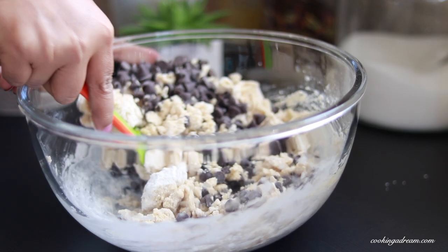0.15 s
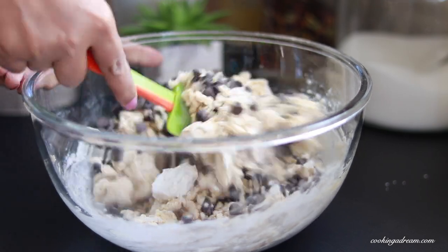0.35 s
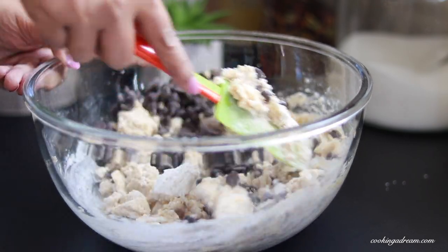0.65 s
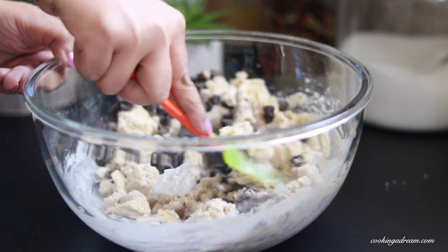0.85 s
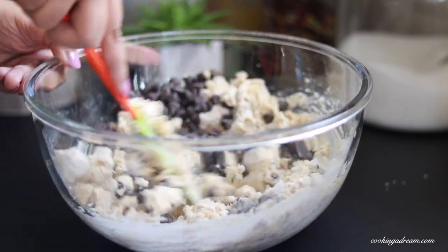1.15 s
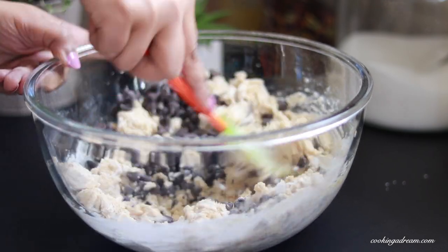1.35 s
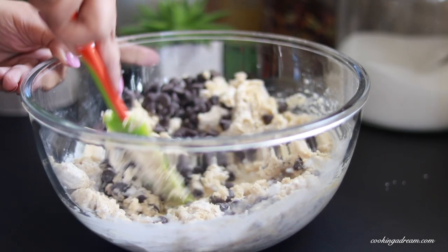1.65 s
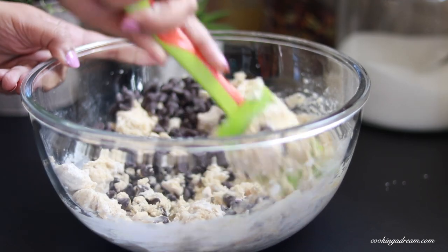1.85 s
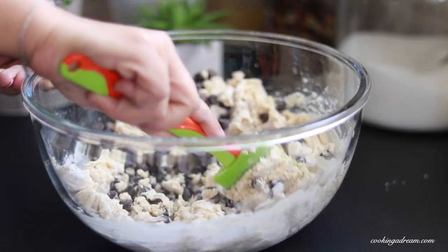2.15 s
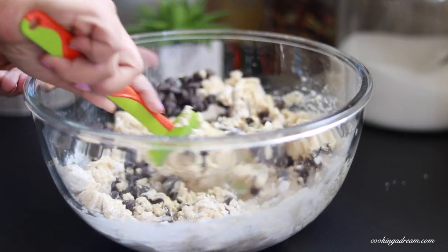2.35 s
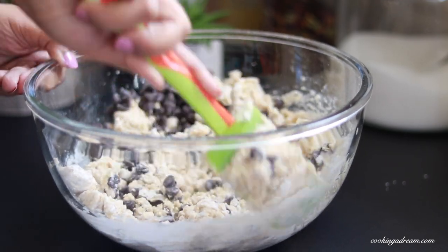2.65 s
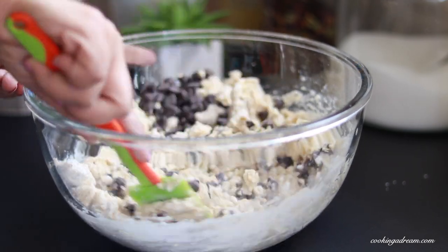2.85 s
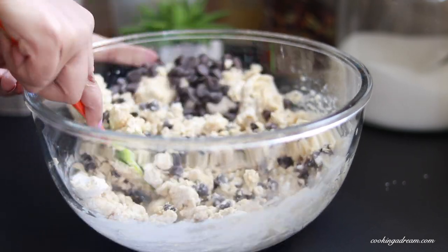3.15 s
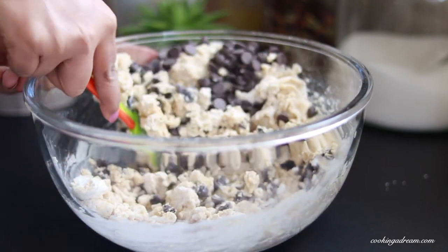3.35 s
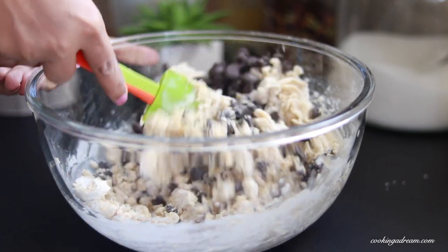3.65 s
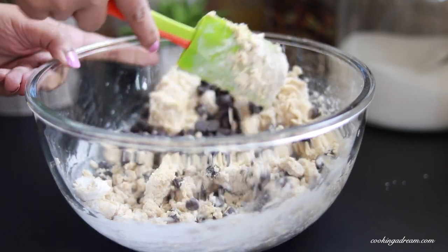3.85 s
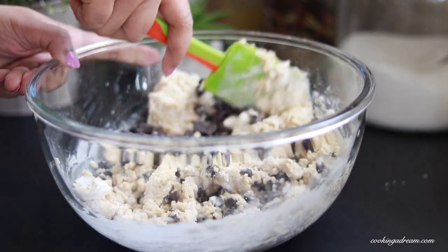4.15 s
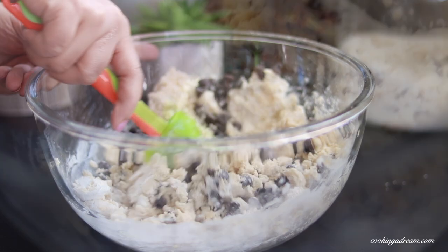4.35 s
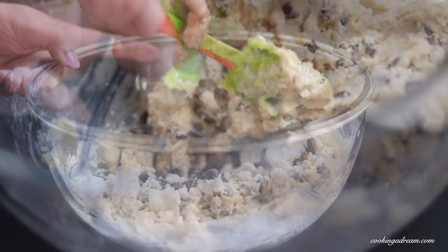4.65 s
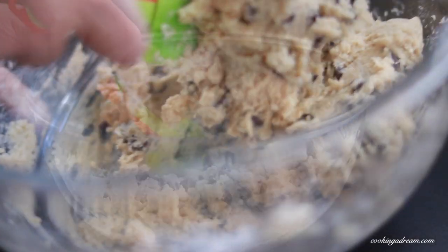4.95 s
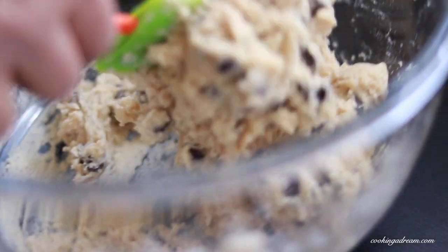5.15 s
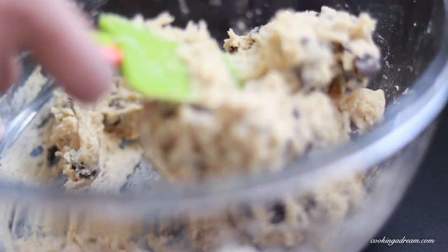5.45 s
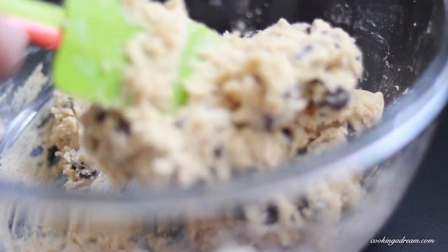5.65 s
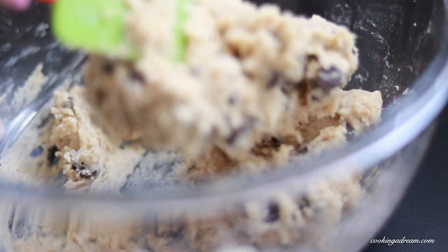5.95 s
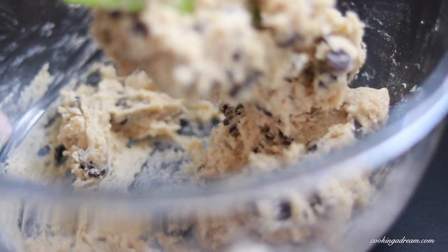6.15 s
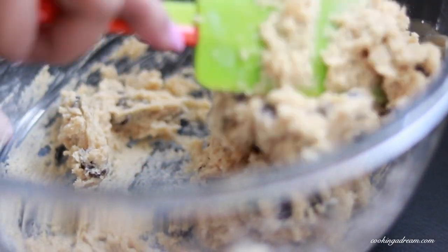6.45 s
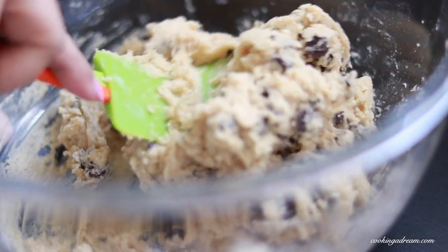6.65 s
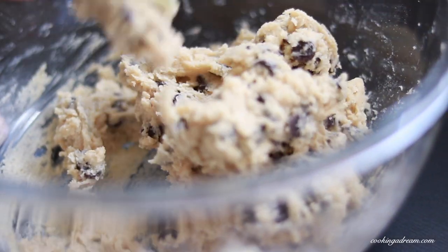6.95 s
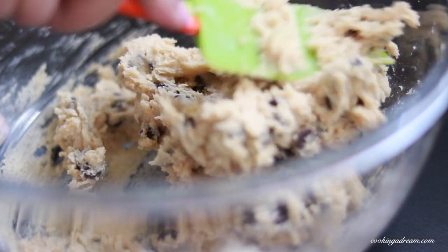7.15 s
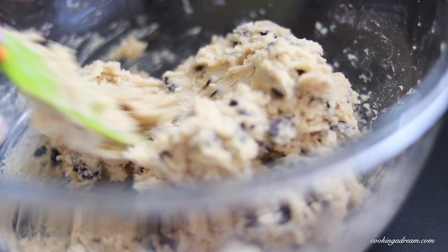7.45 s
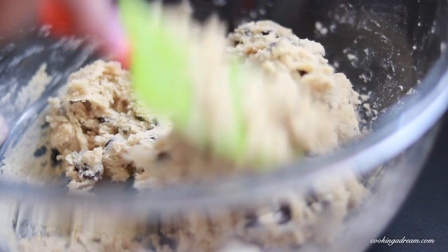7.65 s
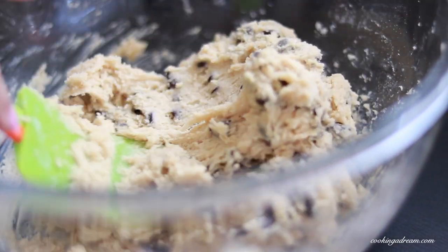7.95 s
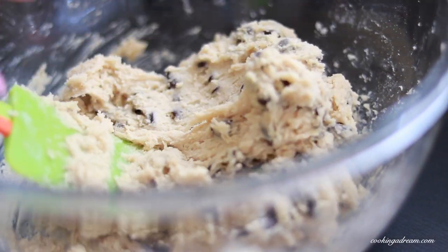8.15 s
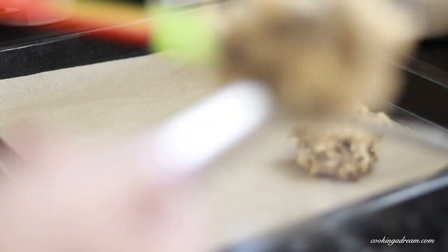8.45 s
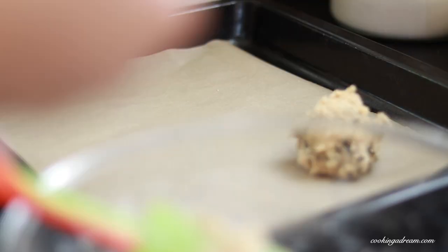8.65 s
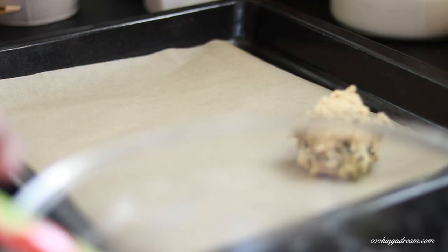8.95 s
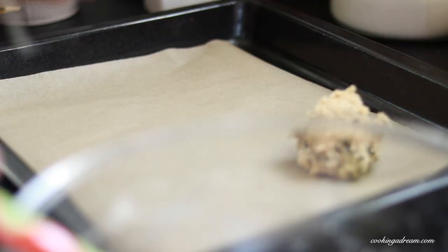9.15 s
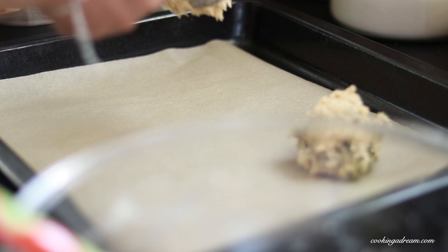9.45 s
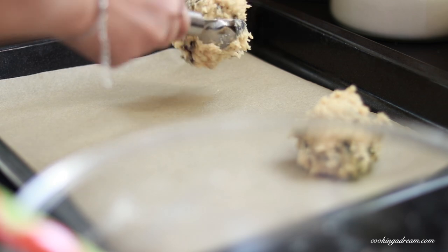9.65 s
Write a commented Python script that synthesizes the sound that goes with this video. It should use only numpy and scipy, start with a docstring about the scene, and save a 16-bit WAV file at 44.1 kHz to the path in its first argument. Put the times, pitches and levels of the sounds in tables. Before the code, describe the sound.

Close in a home kitchen, a spatula works stiff dough in a glass bowl. A hard wooden knock comes first, then sharp ringing clinks, dry rustling strokes and crumbly ticks. A duller thud lands midway among hollow scuffs. Later strokes are sparser, ending with one glass clink. Outside, a small engine speeds up and a few birds whistle faintly.

```python
"""Stiff dough folded in a glass bowl

Close by on a kitchen counter, a spatula folds dough and chocolate chips: clinks and rattles ring the bowl's
paired modes, the handle adds short taps, and ticks, rustle and scuffs are shaped noise.
Two knocks are wooden modes with noise tails. Through the window a small engine, a stack of wavering
multiples, speeds up twice and birds whistle in gliding sines, over filtered-noise room tone and far traffic."""
import sys
import numpy as np
from scipy import signal
from scipy.fft import rfft, irfft, next_fast_len
from scipy.io import wavfile
from scipy.ndimage import uniform_filter1d

SR = 44100
rng = np.random.default_rng(int(sys.argv[2]) if len(sys.argv) > 2 else 0)


def master_out(mix):
    """Clip the mix to full scale and print it as 16-bit PCM to the path in sys.argv[1]."""
    frames = np.transpose(np.atleast_2d(mix))
    ceiling = np.clip(frames, -1, 1)
    pcm = np.round(ceiling * 32767).astype(np.int16)
    wavfile.write(sys.argv[1], SR, pcm)


N = 432607

# Chips and handle striking the glass. Each row: start in seconds, level of the high modes in dB, level of
# the low modes in dB, pitch the struck spot favours in Hz, pitch of the mode whose pair starts in
# opposition in Hz, lift of the lowest mode in dB.
CONTACTS = [(0.399, -48.5, -48, 2640, 5180, 2.5), (0.4637, -38.5, -45.5, 3300, 986, 2),
            (0.509, -40, -55.5, 5180, 2710, 5), (.588, -64, -73, 2710, 986, -6),
            (0.68, -70.5, -78, 2680, 986, -1), (1.2221, -84, -82, 5180, 3875, 0),
            (2.5925, -53.5, -57.5, 1870, 986, 1), (2.6182, -46.5, -50, 2700, 3875, -1.5),
            (2.9742, -53, -67, 2700, 1754, -3), (3.657, -68, -73, 1500, 986, 0),
            (3.689, -75, -63, 1600, 2710, -8), (3.745, -43.5, -59.5, 2050, 986, 0),
            (3.778, -56, -80, 3000, 986, 0), (3.86, -59, -73, 2500, 2710, -3),
            (4.4436, -60.5, -77.5, 1200, 2710, 0.5), (4.5479, -73, -69.5, 4000, 1754, -2),
            (7.812, -77, -74, 3280, 1754, 0), (8.7815, -61.5, -44.5, 2710, 2710, 0.5),
            (8.885, -88, -65, 3870, 2710, 1), (8.944, -80, -67, 2680, 986, 10)]


def from_db(db):
    """Gain of a level in dB."""
    return 10 ** (np.asarray(db) / 20)


def rms_one(x):
    """Scaled to rms 1."""
    return x / np.sqrt(np.mean(x ** 2) + 1e-20)


def in_time(rows):
    """Every column of a curve table, sample by sample."""
    s, *columns = np.transpose(rows)
    return [np.interp(np.arange(N) / SR, s, column) for column in columns]


def at_hz(points, hz, axis=1):
    """A column of a spectrum table at hz, read along log frequency."""
    return np.interp(np.log(hz), np.log(np.array(points)[:, 0]), np.array(points)[:, axis])


def lay(out, s, sound):
    """Adds a short sound to out, starting at s seconds."""
    start = round(s * SR)
    out[..., start:start + sound.shape[-1]] += sound


def drift(rate):
    """Slow random wander of rms 1: noise through a double pole, made at 1/40 of the sample rate."""
    r = np.exp(-80 * np.pi * rate / SR)
    white = rng.standard_normal(N // 40 + 2002)
    slow = signal.lfilter([1], [1, -2 * r, r * r], white)[2000:]
    return np.interp(np.arange(N) / 40, np.arange(len(slow)), rms_one(slow))


def ring(clicks, hz, t60):
    """A two-pole resonance: a unit click starts a decaying sine of initial height 1."""
    r, w = from_db(-60 / (t60 * SR)), 2 * np.pi * hz / SR
    return signal.lfilter([0, np.sin(w)], [1, -2 * r * np.cos(w), r * r], clicks + 1e-18)


def narrow(white, hz, width_hz):
    """Noise twice through one resonance: a band with dark valleys beside it."""
    t60 = np.log(1000) / np.pi / (1.5 * width_hz)
    return ring(ring(white, hz, t60), hz, t60)


def bands(white, low_hz):
    """Half-octave bands of two stereo sources dealt in turn: (centre Hz, left and right)."""
    # Each row: frequency in Hz, likeness of left and right (1 is the same).
    likeness = [(60, 1), (250, 0.98), (500, 0.89), (1000, 0.96), (4000, 0.16), (12000, 0.35)]
    edges = 20 * 2 ** np.arange(0, 10, .5)
    for k, (low, high) in enumerate(zip(edges, edges[1:])):
        if high > low_hz:
            band = signal.butter(2, [low, high], "band", fs=SR, output="sos")
            mid, side = signal.sosfilt(band, white[k % 2])
            centre = np.sqrt(low * high)
            alike = np.clip(at_hz(likeness, centre), -1, 1)
            yield centre, np.sqrt(1 + alike) * mid + np.sqrt(1 - alike) * side * [[1], [-1]]


def bursts(rows):
    """Level in dB of events that rise, hold for their length and fall, summed as power."""
    rise_db_per_s, fall_db_per_s = 451.5, 202.5
    t, power = np.arange(0, N, 64) / SR, 1e-13
    for s, length, db in rows:
        early, late = np.maximum(s - t, 0), np.maximum(t - s - length, 0)
        power = power + from_db(db - rise_db_per_s * early - fall_db_per_s * late) ** 2
    return np.interp(np.arange(N) / SR, t, 10 * np.log10(power))


def glass_bowl():
    """Ringing modes, contact cracks and short pings; a bowl radiates little bass."""
    # Runs of loose chips on the glass. Each row: start in seconds, length in seconds, level in dB.
    rattle_runs = [(0, 0.0082, -75.5), (.44, 0.25, -76), (1.88, 0.33, -87.5), (2.68, 0.55, -74),
                   (3.55, 0.33, -74), (3.72, .08, -85.5), (8.85, 0.14, -84.5)]
    sound = bowl_modes(bursts(rattle_runs)) + cracks() + pings()
    return signal.sosfilt(signal.butter(4, 750, "high", fs=SR, output="sos"), sound)


def bowl_modes(rattle_db):
    """Each contact rings the bowl with new mode strengths; loose chips add many faint contacts."""
    # Modes of the glass. Each row: centre of the pair in Hz, level in dB, t60 of the longer twin in seconds.
    glass_modes = [(965, -4, 0.3), (1745, -3, 0.13), (2705, -1.5, 0.2), (3870, -2.5, 0.24),
                   (5157, -7, 0.13), (6150, -14, .05), (6540, -8, 0.1), (6680, -10, 0.13), (7180, -6, .09),
                   (7420, -7, .08), (7795, -4, .11), (8190, -6, .09), (8400, -10, 0.12), (9000, -14, 0.06),
                   (9255, -1, 0.08), (9690, -11, .1), (9935, -15, .12), (10385, -6, .1), (10550, -10, 0.14),
                   (11790, -10, 0.1), (12990, -23, 0.04), (13300, -23.5, 0.04), (14840, -25, .05)]
    low_modes = 5
    pair_split = 0.0056    # share of the pitch: every mode of a slightly uneven bowl is a close pair
    spot_db_per_octave = 5    # low modes fall away from the favoured pitch
    opposed_lift_db = 0.5    # for a low mode whose twins start in opposition
    high_spread_db, pan_db = 2.5, -2.5    # pan is left less right
    rattle_lift_db = 11    # loose chips favour the second mode, the third by half as much
    flutter_db, flutter_per_s = 3.5, 45    # chips lying against the glass make the low modes flutter

    s, high_db, low_db, spot_hz, opposed_hz, lowest_db = np.transpose(CONTACTS)
    at = (s * SR).astype(int)
    sides = from_db([[pan_db / 2], [-pan_db / 2]])
    chance = rng.standard_normal((len(s), len(glass_modes), 3))
    loose = np.flatnonzero(rng.random(N) < 160 / SR)    # 160 chances of a chip contact per second
    out = np.zeros((2, N))
    for k, (hz, db, t60) in enumerate(glass_modes):
        opposed = abs(np.log2(hz / opposed_hz)) < 1 / 4    # such a mode is faint at first, then swells
        if k < low_modes:
            spot_db = low_db - spot_db_per_octave * abs(np.log2(hz / spot_hz)) + opposed_lift_db * opposed
            spot_db = spot_db + lowest_db * (k == 0)
            flutter = from_db(flutter_db * drift(flutter_per_s))
        else:
            spot_db = high_db + high_spread_db * chance[:, k, 2]
            flutter = 1
        chip_db = db - 15.0 * (k < low_modes) + rattle_lift_db * ((k == 1) + (k == 2) / 2)
        for twin in (0, 1):
            clicks = np.zeros((2, N))
            clicks[:, loose] = from_db(rattle_db[loose] + chip_db) * rng.standard_normal((2, len(loose)))
            lean = 1 + 0.83 * chance[:, k, twin] * [[1], [-1]]    # the lobes of a mode point anywhere
            sign = (-1) ** k * np.where(opposed & (twin == 1), -1, 1)
            clicks[:, at] = sign * from_db(db + spot_db) * sides * lean
            twin_hz = hz * (1 + pair_split * (twin - .5))
            # dough damps the first twin
            out += flutter * ring(clicks, twin_hz, t60 * (.5, 1)[twin]) * (1.4, 1)[twin]
    return out


def cracks():
    """The contact itself: a broad noise burst that dies within hundredths of a second."""
    crack_db, t60_s = 6, 0.032    # level relative to the low modes
    soft = signal.butter(2, 6000, fs=SR, output="sos")
    out, t = np.zeros((2, N)), np.arange(SR // 20) / SR
    for s, _, low_db, *_ in CONTACTS:
        start = int(s * SR)
        crack = rng.standard_normal((2, len(t))) * from_db(low_db + crack_db - 60 * t / t60_s)
        out[:, start:start + len(t)] += signal.sosfilt(soft, crack[0] + .5 * crack)
    return out


def pings():
    """Short pings, one decaying tone each, some sounding with a clink."""
    # Each row: start in seconds, pitch in Hz, level in dB, t60 in seconds.
    ping_tones = [(.465, 5140, -55, 0.11), (.522, 5160, -58, .1), (3.053, 6200, -65, .2),
                  (3.228, 7400, -60, .08), (3.36, 6600, -64, 0.046), (4.0451, 2700, -57, 0.11),
                  (4.1202, 2720, -65.5, 0.065), (8.884, 975, -52, 0.043), (8.7809, 6640, -43.5, 0.065),
                  (4.446, 6050, -56, 0.057), (4.655, 6300, -67.5, 0.089), (6.285, 4380, -60, 0.027),
                  (6.287, 11800, -64, 0.026), (7.466, 2850, -65.5, 0.079)]
    out, click = np.zeros((2, N)), np.arange(SR // 5) == 0
    for s, hz, db, t60 in ping_tones:
        lay(out, s, from_db(db) * ring(click, hz, t60))
    return out


def taps():
    """The handle's short modes, each leaning to a side of its own."""
    # The spatula's handle. Each row: frequency in Hz, level in dB, t60 in seconds.
    handle_modes = [(2990, -4, .022), (4740, -1, .022), (6180, -1, .035), (6650, -7, .05), (7250, -3, .03),
                    (8020, -3, .03), (8850, -5, .035), (10300, -3, .03)]
    # Each row: start in seconds, level in dB, tilt in dB per octave about 6 kHz.
    handle_taps = [(0.3473, -49, -5), (1.2397, -58, 3), (2.956, -58, -1), (2.9733, -37.5, 0),
                   (3.721, -44.5, 2), (3.8875, -54.5, 4), (4.444, -58.5, 7)]
    out, click = np.zeros((2, N)), np.arange(SR // 5) == 0
    for s, db, tilt_db in handle_taps:
        for k, (hz, mode_db, t60) in enumerate(handle_modes):
            lean = 1 + .35 * rng.standard_normal() * np.array([[1], [-1]])
            level_db = db + mode_db + tilt_db * np.log2(hz / 6000) + 0.65 * rng.standard_normal()
            lay(out, s, (-1) ** k * from_db(level_db) * lean * ring(click, hz, t60))
    return out


def ticks():
    """Crumbs and sticky dough: short bright noise bursts that die fast, then slower."""
    # Each row: start in seconds, level in dB, lower edge in Hz, t60 of the slower part in seconds.
    crumb_ticks = [(0.2444, -79, 3240, .18), (0.4625, -26.5, 8000, 0.096), (0.508, -34, 2500, .012),
                   (0.6654, -65, 6250, 0.025), (0.666, -64, 2500, .015), (0.7814, -61, 8450, 0.044),
                   (0.9035, -67, 6400, 0.092), (0.9254, -25.5, 6500, 0.023), (0.926, -30, 9400, 0.074),
                   (1.219, -52.5, 5860, 0.089), (1.983, -51, 11000, 0.04), (2.009, -54, 4200, 0.058),
                   (2.083, -52, 8200, 0.072), (2.2114, -49, 3740, 0.074), (2.216, -51.5, 8000, 0.048),
                   (2.2877, -63, 4000, 0.18), (2.4995, -60, 3900, 0.14), (2.573, -53, 6500, .06),
                   (2.622, -31.5, 6630, 0.072), (2.7422, -50, 8000, 0.068), (2.954, -56, 4000, 0.066),
                   (2.972, -42, 7340, 0.035), (3.229, -60, 6800, .05), (3.272, -60, 10500, .03),
                   (3.34, -53.5, 7500, 0.11), (3.449, -57.5, 4670, 0.16), (3.504, -60, 6700, 0.1),
                   (3.607, -50, 6700, 0.1), (3.622, -48, 6500, 0.067), (3.6403, -57, 7000, .06),
                   (3.675, -48, 6300, 0.067), (3.696, -48, 6900, 0.21), (3.7415, -40.5, 7200, 0.11),
                   (3.845, -50, 6500, 0.04), (4.2154, -55, 6900, 0.12), (4.2436, -55, 8700, 0.055),
                   (4.5438, -41.5, 4430, 0.057), (4.548, -43, 8800, 0.031), (4.554, -40.5, 3680, 0.029),
                   (4.584, -49, 3970, 0.026), (4.585, -55, 9000, 0.034), (4.427, -63, 6000, 0.034),
                   (4.67, -63, 7800, .04), (4.98, -62, 6500, .03), (4.993, -61.5, 6500, 0.03),
                   (5.524, -55, 3900, 0.034), (5.876, -43, 8000, 0.022), (6.82, -60.5, 5900, 0.11),
                   (6.843, -56, 6070, 0.15), (6.8947, -54, 8500, 0.097), (6.916, -46.5, 8400, 0.046),
                   (7.087, -66, 7000, .04), (7.16, -68, 5000, 0.03), (7.3473, -40, 7300, 0.092),
                   (7.372, -48.5, 6800, 0.12), (7.396, -49, 7000, 0.054), (7.412, -50, 6950, 0.11),
                   (7.477, -52.5, 6200, 0.043), (7.503, -54, 6300, 0.029), (7.638, -51.5, 6200, 0.05),
                   (7.65, -46.5, 6540, 0.07), (7.675, -43.5, 6760, 0.023), (7.784, -56, 7200, 0.054),
                   (8.928, -55.5, 1880, 0.23), (8.928, -57, 5700, 0.09)]
    octaves_wide, octaves_per_db = .3, .027    # width of a tick near -20 dB; fainter ones are broader
    pan_mean_db, pan_spread_db = -1, 4    # left less right
    out, t = np.zeros((2, N)), np.arange(SR // 5) / SR
    for s, level_db, hz, t60 in crumb_ticks:
        octaves = max(octaves_wide - octaves_per_db * (level_db + 20.5), .2)
        pan_db = pan_mean_db + pan_spread_db * rng.standard_normal()
        white = rng.standard_normal((2, len(t)))
        white[1] = .6 * white[0] + .8 * white[1]    # the sides are partly alike
        decay = from_db(-60 * t / 0.0073) + 1.04 * from_db(-60 * t / t60)
        burst = white * np.minimum(t / 0.0012, 1) * decay
        band = signal.butter(3, [hz, min(hz * 2 ** octaves, 15500)], "band", fs=SR, output="sos")
        sides = from_db([[level_db + pan_db / 2], [level_db - pan_db / 2]])
        lay(out, s, signal.sosfilt(band, burst) * sides)
    return out


def stir():
    """Level of the rustle below and above 10 kHz: spatula strokes over a faint hiss."""
    # Strokes through the dough. Each row: start in seconds, length in seconds, level below 10 kHz in dB,
    # level above 10 kHz relative to it in dB.
    dough_strokes = [(0.267, 0.2, -58.5, -32), (0.403, .04, -54, -5), (0.454, 0.042, -50.5, -15),
                     (0.503, 0.2, -76, -16), (0.918, 0.11, -58, -20), (1.493, 0.53, -71, -4),
                     (1.947, 0.52, -69, 2), (2.586, 0.32, -61, -6.5), (2.953, 0.28, -64.5, -5),
                     (3.24, .4, -72.5, 0), (3.68, 0.073, -59.5, -1), (3.8, 0.17, -73.5, 2),
                     (3.993, 0.49, -75, -5), (4.55, 0.25, -79, 2), (5.078, 0.22, -67.5, -10),
                     (5.484, 0.089, -76, 7), (5.866, 0.041, -79, 15), (6.5, 0.17, -77, -1.5),
                     (6.762, 0.1, -69, -3), (7.324, 0.11, -67, 3.5), (7.434, 0.055, -84, -6),
                     (7.64, 0.055, -77, 5), (7.703, 0.11, -75.5, -5.5), (8.76, 0.19, -73.5, -13.5)]
    # Hiss between the strokes, dropping out briefly late on. Each row: time in seconds, level in dB.
    hiss_curve = [(0, -76.5), (4.5, -78), (6.3, -77.5), (7.8, -77.5), (7.88, -100), (8.33, -105),
                  (8.4, -82), (9.81, -79.5)]
    hiss, = in_time(hiss_curve)
    low = bursts([(s, length, db) for s, length, db, top_db in dough_strokes])
    high = bursts([(s, length, db + top_db) for s, length, db, top_db in dough_strokes])
    pairs = (low, hiss), (high, hiss - 6)    # the hiss is 6 dB weaker above 10 kHz
    return [10 * np.log10(from_db(a) ** 2 + from_db(b) ** 2) for a, b in pairs]


def rustle(low_db, high_db):
    """Crumbs and dough: clumps of tiny uneven bursts on a soft hiss, each band patchy on its own."""
    # Each row: frequency in Hz, level in dB per half octave.
    dough_spectrum = [(2500, -15), (4000, -12), (6000, -9.5), (8700, -6.5), (12300, -4.5), (17400, -15)]
    sizes = from_db(0.74 * np.minimum(rng.exponential(1, (2, 1, N)), 5))
    grains_per_s = 900 * from_db(2.5 * drift(25))
    grains = uniform_filter1d(sizes * (rng.random((2, 1, N)) < grains_per_s / SR), size=40)
    white = rng.standard_normal((2, 2, N)) * (1.3 + grains / grains.mean())
    out = np.zeros((2, N))
    for hz, x in bands(white, 2500):
        stroke_db = low_db if hz < 1e4 else high_db
        out += from_db(stroke_db + at_hz(dough_spectrum, hz) + 2.0 * drift(12)) * rms_one(x)
    return out


def scuffs():
    """Scuffs and soft bumps: swelling friction noise, part through broad resonances of the loaded bowl."""
    # Each row: start in seconds, length in seconds, level in dB, centre in Hz, share through the bowl's
    # resonances (held to 0-1).
    slides = [(0.259, 0.037, -46.5, 300, 0.1), (0.0, 0.1, -72.5, 2070, 0), (0.877, 0.27, -64, 2700, 0.35),
              (1.149, 0.15, -71, 2200, 0.4), (1.474, 0.16, -61.5, 1820, 0.44),
              (1.968, 0.069, -62.5, 430, 0.03), (2.103, 0.11, -72, 2540, 0.17),
              (2.151, 0.057, -64.5, 410, 0.1), (2.2, 0.27, -76, 4500, 0), (2.458, 0.097, -77, 4550, 0),
              (2.705, 0.18, -66, 2800, 0), (2.79, 0.075, -60.5, 380, 0.06), (2.997, 0.41, -69, 2360, 0.54),
              (3.678, 0.092, -62, 636, 0.24), (3.873, 0.041, -61.5, 233, 0.05), (4.661, 0.058, -66, 330, 0),
              (4.857, 0.46, -61, 210, 0.03), (4.913, 0.45, -65, 1800, 1.07),
              (5.035, 0.28, -58.5, 2200, 0.96), (5.045, 0.086, -59, 1100, 0.04),
              (4.971, .28, -63, 1450, 0.2), (5.072, 0.14, -77, 5200, 0.05), (6.05, 0.15, -62, 1670, 0.35),
              (6.077, 0.12, -59.5, 417, 0.45), (6.731, 0.15, -72.5, 2750, 0.23),
              (7.21, 0.11, -79.5, 3400, 0.1), (7.34, 0.15, -80, 3840, 0.2), (8.91, .08, -84, 4770, 0.2)]
    # Resonances of the loaded bowl. Each row: frequency in Hz, width in Hz, level in dB.
    loaded_bowl = [(580, 60, -10), (820, 60, -12), (1110, 80, -3), (1445, 65, 0), (1760, 120, -10),
                   (2200, 70, -5), (2770, 120, -4), (3050, 100, -11), (3630, 90, -13), (3970, 90, -18)]
    grit_db = 1.1    # unevenness of the friction
    out = np.zeros((2, N))
    for s, length, db, hz, share in slides:
        share, size = np.clip(share, 0, 1), round(length * SR)
        white = rng.standard_normal((2, size))
        white[1] = .6 * white[0] + .8 * white[1]
        band = signal.butter(1, [hz / 1.066, hz * 1.096], "band", fs=SR, output="sos")
        broad = signal.sosfilt(band, white)
        hollow = sum((-1) ** k * from_db(mode_db) * rms_one(narrow(white, mode_hz, width_hz))
                     for k, (mode_hz, width_hz, mode_db) in enumerate(loaded_bowl))
        swell = np.sin(np.pi * np.arange(size) / size) ** 1.4
        mix = (1 - share) * rms_one(broad) + share * rms_one(hollow)
        lay(out, s, from_db(db) * swell * mix)
    grit = from_db(grit_db * (drift(66) + drift(5.1)))
    return out * grit * from_db([[1.5], [-1.5]])    # louder on the left


def knock(s, modes, modes_db, snap_db, contact_hz, tail_db, tilt_db, pan_db):
    """A short push, hollow wooden modes and a tail of noise that dies band by band."""
    # Noise tail. Each row: frequency in Hz, level in dB per Hz, t60 in seconds.
    tail_spectrum = [(100, -7.5, 0.27), (300, -1, 0.4), (699, -12, 0.34), (1482, -21, 0.38),
                     (3000, -26, 0.15), (8000, -48, .15)]
    t = np.arange(SR // 2) / SR
    click = 1. * (t == 0)
    body = 0
    for k, (hz, db, t60) in enumerate(modes):
        lean = np.tanh((hz / 1000) ** 2) * (-1) ** (k // 2)    # higher modes radiate more to one side
        damped = ring(click, hz, min(t60, .3))    # no mode rings longer than 0.3 s
        body = body + (-1) ** k * from_db(modes_db + db) * damped * [[1 + lean], [1 - lean]]
    snap = from_db(snap_db) * ring(click, contact_hz, 1.3 / contact_hz)
    white = rng.standard_normal((2, 2, len(t))) * np.minimum(t / 0.00027, 1)
    tail = 0
    for hz, x in bands(white, 90):
        decay_db = -60 * t / at_hz(tail_spectrum, hz, axis=2)
        tail = tail + from_db(at_hz(tail_spectrum, hz) + tilt_db * np.log2(hz / 300) + decay_db) * x
    blow = body + snap * from_db([[pan_db / 2], [-pan_db / 2]]) + from_db(tail_db) * tail
    # a soft contact, a small body
    soft = signal.butter(2, [80, 2.6 * contact_hz], "band", fs=SR, output="sos")
    out = np.zeros((2, N))
    lay(out, s, signal.sosfilt(soft, blow))
    return out


def sharp_knock():
    """A hard knock: wooden modes with a strong snap at the contact."""
    # Each row: frequency in Hz, level in dB, t60 in seconds.
    hard_modes = [(138, -13, 0.16), (228.2, 2, 0.22), (256, -1, 0.22), (295, 1.5, 0.23), (373.7, 0, 0.18),
                  (418, -1.5, 0.19), (518, -6.5, 0.23), (610, -14, .2), (740, -15.5, 0.22),
                  (976, -19.5, .15), (1144, -9.5, 0.2), (1235, -11.5, 0.15), (1660, -20, 0.15)]
    return knock(.2792, hard_modes, modes_db=-28.5, snap_db=-4, contact_hz=1510,
                 tail_db=-12.0, tilt_db=1.5, pan_db=-7.0)


def dull_knock():
    """A soft thud: wooden modes with a weaker snap."""
    # Each row: frequency in Hz, level in dB, t60 in seconds (knock() holds it to 0.3 at most).
    thud_modes = [(145.5, -31.5, 0.39), (208, -36, 0.22), (255, -23, 0.18), (284, -6, 0.047),
                  (341, -10, 0.22), (407, -16, 0.19), (453, -11, 0.16), (458, -12.5, 0.034),
                  (523, -20.5, 0.25), (608, -25.5, 0.33), (704, -31, 0.24), (990, -25, 0.12),
                  (1156, -18.5, 0.055), (1370, -41, 0.29), (1650, -46, 0.17)]
    return knock(5.2665, thud_modes, modes_db=-12, snap_db=-14, contact_hz=1800,
                 tail_db=-13.0, tilt_db=-0.5, pan_db=-10)


def scatter(x):
    """Three short all-passes break single echoes into a wash."""
    size = next_fast_len(N + SR // 5)
    spectrum = rfft(x, size)
    turn = np.exp(-2j * np.pi * np.arange(size // 2 + 1) / size)    # a delay of one sample
    for lag in (71, 149, 241):
        spectrum = spectrum * (turn ** lag - .6) / (1 - .6 * turn ** lag)
    return irfft(spectrum, size)[:N]


def kitchen(x):
    """Room echoes: six feedback delays a side, duller on every round, stepped block by block."""
    t60_s, wall_cut_hz = 0.34, 12000
    out, dull = np.zeros((2, N)), np.exp(-2 * np.pi * wall_cut_hz / SR)
    for k, lag in enumerate((rng.uniform(.012, .035, 12) * SR).astype(int)):
        loop, gain, state = x.copy(), from_db(-60 * lag / SR / t60_s), [0.]
        for i in range(lag, N, lag):
            back, state = signal.lfilter([gain * (1 - dull)], [1, -dull], loop[i - lag:i], zi=state)
            loop[i:i + lag] += back[:N - i]
        out[k % 2] += (loop - x) * (-1) ** (k // 2)
    return out


def engine():
    """Multiples of the firing cycle slide through the bass resonances of the room; each wavers."""
    # Each row: time in seconds, speed in cycles per second.
    speed_curve = [(.98, 16), (1.15, 17.6), (1.4, 18.2), (1.81, 20.2), (2.19, 21.8), (2.57, 23.3),
                   (3.26, 25.2), (3.7, 25.7), (4.36, 26.2), (4.83, 25.7), (5.2, 25.1), (6.15, 25.2),
                   (7.11, 24.9), (7.5, 25.6), (8.4, 26.2), (8.95, 26.8), (9.49, 27.9), (9.81, 28.5)]
    # Engine load, as level. Each row: time in seconds, level in dB.
    load_curve = [(.98, -98), (1.2, -72.5), (1.4, -63.5), (1.8, -58.5), (2.1, -62), (2.4, -59), (3.3, -58),
                  (3.7, -62.5), (4.4, -69.5), (5.0, -65), (5.6, -72.5), (6.2, -69.5), (6.6, -71),
                  (6.9, -69.5), (7.5, -70.5), (8.0, -65.5), (8.4, -61.5), (9.0, -59.5), (9.3, -57.5),
                  (9.55, -58), (9.81, -57)]
    # Each row: multiple of the cycle, level in dB.
    multiples = [(4, 1), (5, -4.5), (6, -15.5), (7, -4.5), (8, -6.5), (9, -18.5), (10, -22.5), (11, -21),
                 (12, -13.5), (13, -28.5), (14, -25), (15, -23), (16, -26.5), (17, -26), (18, -25.5),
                 (19, -30.5), (20, -22.5)]
    # The room lifts some low tones and swallows others. Each row: frequency in Hz, gain in dB.
    room_bass = [(68, -2.5), (80, -2), (97, 1), (112, -3.5), (120, -12), (132, 9), (142, 8), (152, -2),
                 (162, 3), (178, -1), (197, 6), (210, -4), (225, 4.5), (250, -4), (300, -1), (330, -2.5),
                 (380, -2), (430, 2), (480, 3), (530, -2.5), (570, -0.5)]
    # below full load the multiples above the fifth lose a further 0.48 dB per dB
    full_load_db, thinning = -56.5, 0.48
    upper_wander = .2    # cycles by which the upper multiples stray

    (per_s,), (load_db,) = in_time(speed_curve), in_time(load_curve)
    turns = np.cumsum(per_s * (1 + 0.0043 * drift(10))) / SR
    thin_db = thinning * np.minimum(load_db - full_load_db, 0)
    out = np.zeros(N)
    for j, (k, db) in enumerate(multiples):
        k = round(k)
        upper = k > 8.5
        waver_db = (2.0 + 2.0 * upper) * drift(4.35) + (2.0 + 2.2 * upper) * drift(8.2)
        level_db = load_db + db + thin_db * (j > 1) + at_hz(room_bass, k * per_s) + waver_db
        phase = k * turns + upper_wander * upper * drift(6.0) + rng.random()
        out += np.sqrt(2) * from_db(level_db) * np.sin(2 * np.pi * phase)
    return out


def birds():
    """Hoarse whistles that glide and settle, smeared by echoes from the walls outside."""
    # Each row: start in seconds, length in seconds, first pitch in Hz, last pitch in Hz, level in dB,
    # bend (1 is an even glide, more settles sooner).
    whistle_glides = [(1.274, 0.15, 5110, 4090, -74.5, 1.23), (1.56, 0.032, 5900, 5760, -70.5, 2),
                      (1.68, 0.15, 5470, 4310, -71, 3.8), (4.45, 0.066, 4880, 4560, -72.5, 1.7),
                      (4.825, 0.06, 4640, 4380, -74, 1.3), (4.86, 0.037, 4460, 4800, -81, 1.6),
                      (4.915, 0.015, 4440, 4400, -71, 1.1), (5.145, 0.028, 4720, 4300, -73, 1.1),
                      (5.498, 0.16, 4920, 4050, -72.5, 1.2), (7.898, 0.12, 5000, 4416, -77.5, 3.3),
                      (8.117, 0.026, 5630, 5780, -81.5, 1.2), (8.128, 0.024, 5900, 6220, -79.5, 1.6),
                      (8.14, 0.049, 6460, 7310, -76.5, 1.3), (8.259, 0.12, 4940, 4090, -74.5, 3.2),
                      (8.668, 0.061, 3410, 3600, -73, 1.05), (8.675, 0.056, 3750, 3850, -81, 1.3),
                      (8.74, 0.049, 2800, 2820, -78, 1.6)]
    # Walls outside. Each row: delay in seconds, level in dB.
    yard_walls = [(.011, -4), (0.021, -9), (.038, -11), (.057, -14)]
    out, warble = np.zeros(N), 1 + .011 * drift(70)    # the pitch trembles by about 1 %
    for s, length, first_hz, last_hz, db, bend in whistle_glides:
        share = np.arange(round(length * SR)) / (length * SR)
        glide_hz = last_hz + (first_hz - last_hz) * (1 - share) ** bend
        hz = glide_hz * warble[round(s * SR):][:len(share)]
        swell = np.sin(np.pi * share) ** 0.3
        lay(out, s, from_db(db) * swell * np.sin(2 * np.pi * np.cumsum(hz) / SR))
    out = out * from_db(3.8 * drift(50))    # hoarseness
    return out + sum(from_db(db) * np.roll(out, round(s * SR)) for s, db in yard_walls)


def air():
    """Room tone and far traffic: slightly patchy noise bands and a wavering low hum."""
    # Each row: frequency in Hz, level in dB per Hz.
    air_spectrum = [(12, -34), (20, 12.5), (43, 11), (65, 4.5), (120, -4), (168, -2), (357, -7),
                    (698, -8.5), (1000, -8), (1960, -27.5), (5080, -32.5), (6910, -37), (11800, -36),
                    (16000, -50)]
    air_db = -64.5
    hum_hz, hum_width_hz, hum_db = 64.8, 16, -66.5
    white = rng.standard_normal((2, 2, N))
    hum = from_db(hum_db) * rms_one(ring(white[0, 1], hum_hz, np.log(1000) / np.pi / hum_width_hz))
    quiet_start = np.arange(N) < 1.2 * SR    # the hum is weaker until the engine runs
    hum = hum * from_db(2.0 * drift(0.25) - 9.6 * quiet_start)
    tone = np.zeros((2, N))
    for hz, x in bands(white, 0):
        patchy_db = (1.5 + 1.6 * (hz < 90)) * drift(8.2)
        tone += from_db(at_hz(air_spectrum, hz) + patchy_db) * x
    return hum + from_db(air_db) * rms_one(tone)


def scene():
    """Bowl and knocks close by in the kitchen, street sounds behind."""
    bowl = glass_bowl() + taps() + ticks()
    whistles = birds()
    room_feed = bowl.mean(axis=0) + from_db(-5) * whistles    # the whistles stir the room less
    echoes = from_db(-12) * kitchen(scatter(room_feed))
    knocks = sharp_knock() + dull_knock()
    return bowl + whistles + echoes + knocks + rustle(*stir()) + scuffs() + engine() + air()


def record(dry):
    """The microphone loses the deepest bass; the top is cut steeply at 15750 Hz."""
    thin = signal.sosfilt(signal.butter(2, 30, "high", fs=SR, output="sos"), dry)
    return signal.sosfilt(signal.ellip(10, .5, 60, 15750, fs=SR, output="sos"), thin)


dry = scene()
out = record(dry)
master_out(out)
```